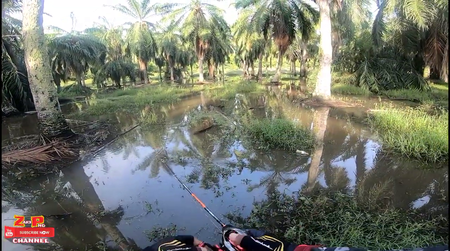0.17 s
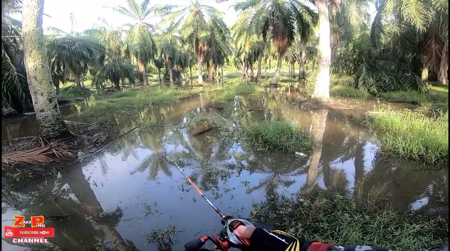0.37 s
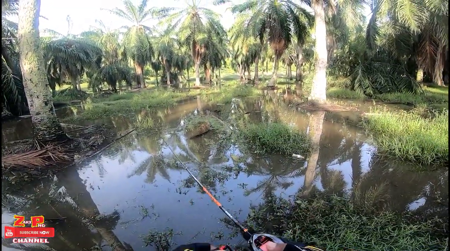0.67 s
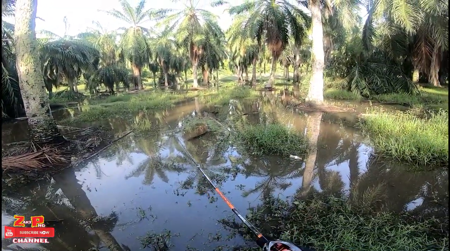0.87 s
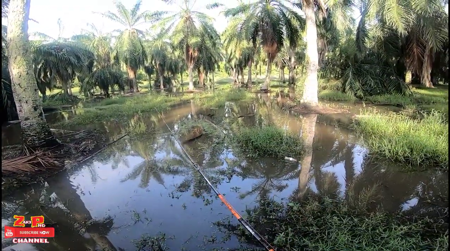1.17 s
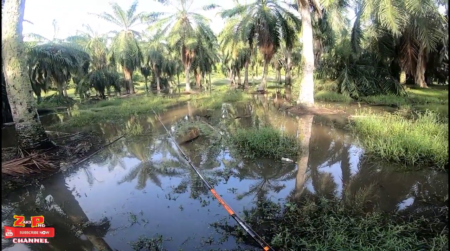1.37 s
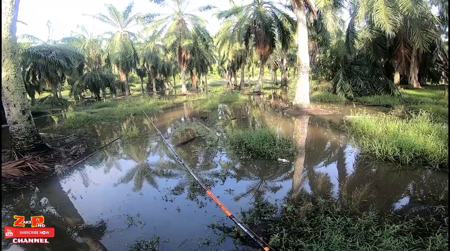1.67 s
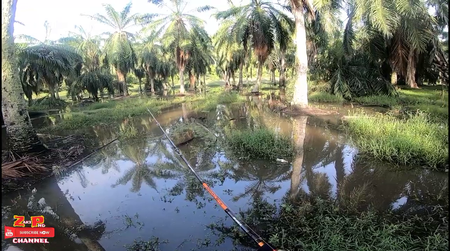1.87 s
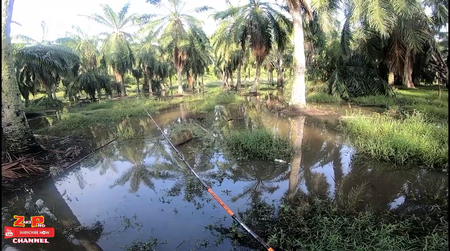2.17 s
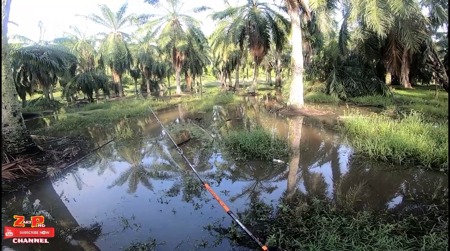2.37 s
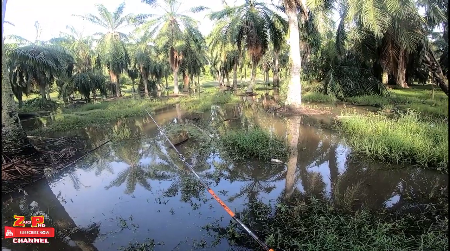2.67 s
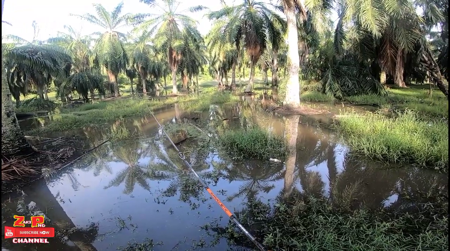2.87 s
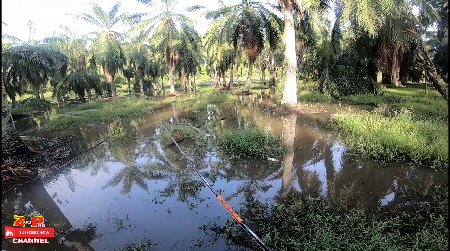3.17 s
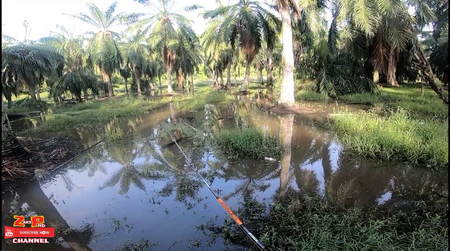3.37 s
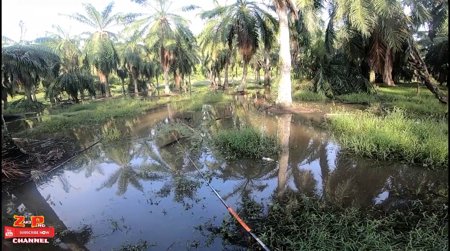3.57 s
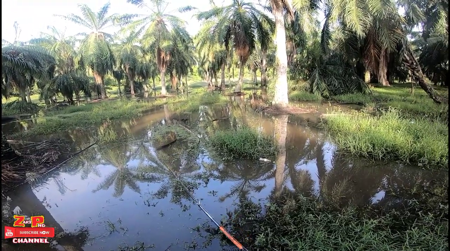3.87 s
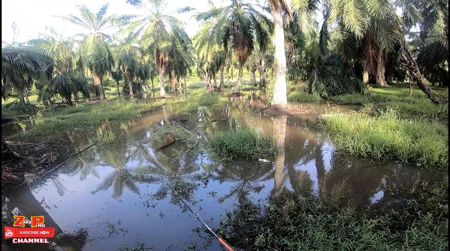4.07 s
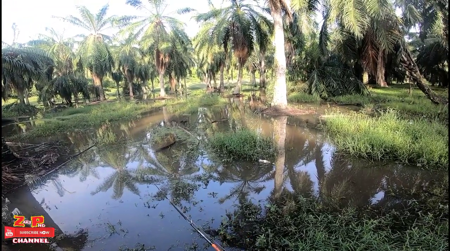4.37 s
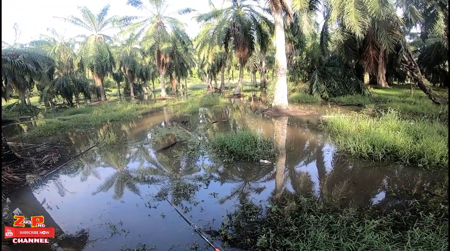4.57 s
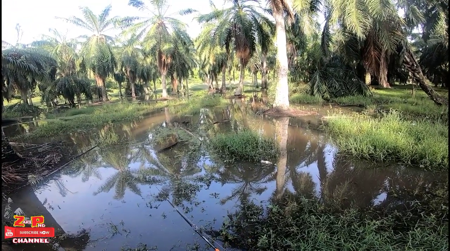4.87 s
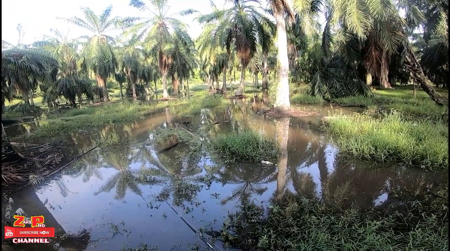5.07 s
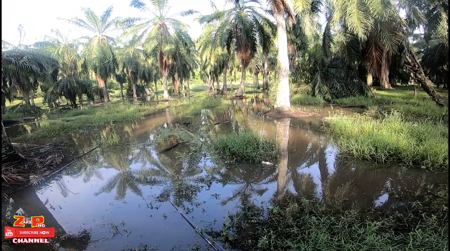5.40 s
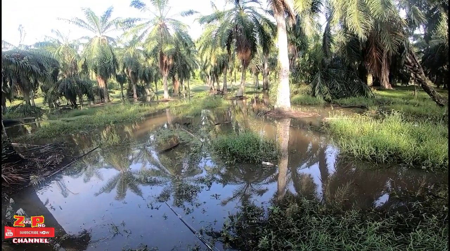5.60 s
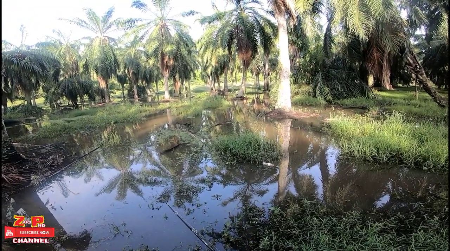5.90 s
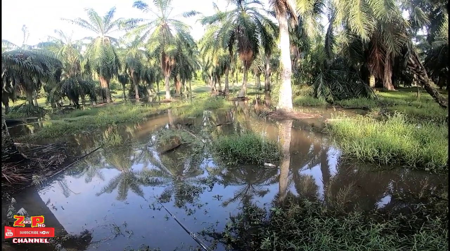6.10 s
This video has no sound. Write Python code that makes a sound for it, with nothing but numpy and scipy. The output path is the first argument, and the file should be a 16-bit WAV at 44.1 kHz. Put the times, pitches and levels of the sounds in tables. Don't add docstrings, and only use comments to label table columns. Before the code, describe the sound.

A daytime flooded grove, heard in wide stereo from a recorder worn close to an angler, its top end dulled by a housing. Throughout, a dense cicada chorus sings as a high, fizzing drone around five kilohertz, swelling only slightly. Beneath it sit a low, wavering pump hum near ninety hertz, soft rumble and a faint engine gradually rising in pitch. At 0.07-0.13 s come tiny contact ticks, then at 0.15 s a loud, dry reel latch snap with very quick bounces. A sleeve rustles softly around 0.5 s while line squeaks faintly from 0.3 to 0.8 s. Later details are almost buried: katydid buzzes in threes from 1.3 and 4.25 s, low hoots near 2.0, 3.4, 4.65 and 5.8 s, a rising bird whistle at 2.8 s, chirps, frog croaks, cricket ticks, and drips at 1.65, 4.6 and 5.8 s. The drone continues to the end at about 6.2 s.

```python
import sys
import numpy as np
from scipy import signal
from scipy.fft import rfft, irfft
from scipy.io import wavfile

SR = 44100
rng = np.random.default_rng(int(sys.argv[2]) if len(sys.argv) > 2 else 0)


def to_wav(s):
    ch = np.atleast_2d(s).T
    pcm = np.round(np.clip(ch, -1, 1) * 32767)
    wavfile.write(sys.argv[1], SR, pcm.astype(np.int16))


def field_ratio(decibels):
    return 10 ** (np.asarray(decibels, dtype=float) / 20)


N = 275184
T = np.arange(N) / SR
HZ = np.maximum(np.arange(N // 2 + 1) * SR / N, 1)
MID_SIDE = np.array([[1], [-1]])


def rms_one(x):
    return x / np.sqrt(np.mean(x ** 2) + 1e-20)


def in_time(rows):
    s, *columns = np.transpose(rows)
    return [np.interp(T, s, column) for column in columns]


def at_hz(points, axis=1):
    points = np.array(points)
    return np.interp(np.log(HZ), np.log(points[:, 0]), points[:, axis])


def drift(rate_hz):
    r = np.exp(-2 * np.pi * rate_hz * 40 / SR)
    white = rng.standard_normal(N // 40 + 2002)
    slow = signal.lfilter([1], [1, -2 * r, r * r], white)[2000:]
    return np.interp(np.arange(N) / 40, np.arange(len(slow)), rms_one(slow))


def ring(clicks, hz, t60_s):
    r = field_ratio(-60 / (t60_s * SR))
    w = 2 * np.pi * hz / SR
    return signal.lfilter([0, np.sin(w)], [1, -2 * r * np.cos(w), r * r], clicks + 1e-18)


def pan(x, db):
    return x * field_ratio(MID_SIDE * db / 2)


# (frequency [Hz], likeness [0-1], left minus right [dB], left lead [rad])
PORT_FIELD = [(60, 0.75, -1, 1.1), (150, 1, -2.5, -1.4), (264, 0.97, -2, 0.4), (420, 0.84, -5, -0.9),
              (690, 0, -2, 0.1), (1130, 0, 1.5, -0.2), (1700, 0.36, .6, 0.15), (2700, 0.43, -.4, -0.8),
              (3880, 0.96, 0.5, 0.82), (4910, 0.32, -4, 0.38), (6200, .05, -6, -0.5),
              (7200, 0.45, -6.5, -3), (8950, 0.02, 4.5, -2.5), (10000, 0.28, 2, -3.5), (13700, 0.6, 1, -2)]


def at_ports(pair, response):
    common, apart = rfft(pair) * response
    alike = np.clip(at_hz(PORT_FIELD), 0, 1)
    turn = field_ratio(at_hz(PORT_FIELD, axis=2) / 2) * np.exp(.5j * at_hz(PORT_FIELD, axis=3))
    common = np.sqrt(1 + alike) * common
    apart = np.sqrt(1 - alike) * apart
    return rms_one(irfft([(common + apart) * turn, (common - apart) / turn], N))


# (frequency [Hz], width [Hz], level [dB])
CICADA_BODY = [(4740, 760, 2), (5167, 790, -3.5), (7260, 890, -14), (8470, 820, -12.5), (8726, 1300, -7),
               (9930, 1600, -15), (14100, 1900, -29.5)]
# (time [s], level [dB])
CHORUS_SWELL = [(0, -57), (.5, -57.5), (1.15, -58), (2.15, -56.5), (3.1, -56), (3.6, -57.5), (4.3, -56.5),
                (5.5, -57), (6.24, -57)]


def cicadas(count=10, buckles_per_s=128, near=0.34, steep=3.16):
    far = rng.standard_normal((2, N))
    buckle = np.zeros((2, N))
    for k in range(count):
        rate_hz = buckles_per_s * rng.uniform(.92, 1.15) * (1 + 0.0152 * drift(4.06))
        pulses = np.exp(4 * np.cos(2 * np.pi * np.cumsum(rate_hz) / SR))
        buckle[k % 2] += field_ratio(1.6 * drift(1.3)) * pulses * rng.standard_normal(N)
    drive = far + near * rms_one(buckle)
    powers = [field_ratio(2 * db) / (1 + (2 * (HZ - hz) / width_hz) ** 2) ** steep
              for hz, width_hz, db in CICADA_BODY]
    low_db, = in_time(CHORUS_SWELL)
    high_db = -61 + 0.97 * (low_db - low_db.mean())
    low = at_ports(drive, np.sqrt(sum(powers[:2])))
    high = at_ports(drive[::-1], np.sqrt(sum(powers[2:])))
    return field_ratio(low_db + 0.87 * drift(8.4)) * low + field_ratio(high_db + 0.5 * drift(20)) * high


def from_right(tones):
    late_s = .00017
    return pan(np.sqrt(2) * np.array([np.interp(T - late_s, T, tones), tones]), -2.04)


# (time [s], level [dB])
PUMP_LEVEL = [(0.0, -36), (0.05, -38), (1.18, -39.5), (1.27, -43), (2.05, -43.5), (2.14, -40), (4.17, -41),
              (5.32, -37.5), (5.56, -43.5), (5.74, -37.5), (6.21, -43), (6.24, -41)]
# (frequency [Hz], level [dB], waver [dB])
PUMP_HUM = [(46.3, -55.5, -3.5), (55.9, -44, 2.5), (62.9, -52, 2.5), (67, -52.5, -4), (96.1, -54, 3.5),
            (91.63, -53.5, 1), (102, -50.5, -2.5), (112.44, -44.5, 2), (140.9, -60, 0), (183.3, -59.5, 1)]


def pumps():
    pump_hz, wander_turns = 93.6, 0.047
    level_db, = in_time(PUMP_LEVEL)
    tones = field_ratio(level_db + 2.0) * np.sin(2 * np.pi * (pump_hz * T + wander_turns * drift(0.29)))
    for hz, hum_db, waver_db in PUMP_HUM:
        turns = hz * T + rng.random() + 0.067 * drift(1.4)
        tones = tones + field_ratio(hum_db + waver_db * drift(1.5)) * np.sin(2 * np.pi * turns)
    return from_right(tones)


# (time [s], firing rate [Hz], level [dB])
ENGINE_RUN = [(0, 55.7, -69), (.9, 56.04, -71.5), (1.2, 55.9, -64), (2.2, 56.34, -64.5),
              (2.6, 57.16, -62.5), (3.7, 57.12, -62.5), (4.2, 56.8, -69), (5, 57, -66.5),
              (5.7, 57.9, -65.5), (6.24, 58.1, -63.5)]
# (multiple of firing rate, level [dB])
FIRING_ORDERS = [(2, 10.5), (3, -3.5), (4, -0.5), (5, -4), (6, -1.54), (7, -14.5)]


def engine():
    hz, level_db = in_time(ENGINE_RUN)
    turns = np.cumsum(hz) / SR
    tones = np.zeros(N)
    for multiple, rel_db in FIRING_ORDERS:
        order = np.sin(2 * np.pi * (multiple * turns + 0.054 * drift(4.8)))
        tones += field_ratio(level_db + rel_db + 2.74 * drift(4.2)) * order
    return from_right(tones)


# (frequency [Hz], density [dB per Hz])
RUMBLE_SPECTRUM = [(20, -32.5), (35, -10), (55, -0.5), (80, -17), (105, -6), (140, -7), (200, -11.5),
                   (300, -20), (420, -34), (700, -56)]


def rumble():
    level_db = -48.5
    return field_ratio(level_db) * at_ports(rng.standard_normal((2, N)), field_ratio(at_hz(RUMBLE_SPECTRUM)))


# (frequency [Hz], density [dB per Hz])
AIR_SPECTRUM = [(240, -15), (400, -7.5), (550, -11), (780, -6.5), (970, -11.5), (1300, -9.5), (2000, -13),
                (3000, -16), (4000, -20), (6200, -19.5), (9000, -14.5), (10300, -17), (11200, -56.5),
                (16000, -79)]


def air(level_db=-60.5, patchy_db=1.5):
    hiss = rfft(at_ports(rng.standard_normal((2, N)), field_ratio(at_hz(AIR_SPECTRUM))))
    edges_hz = [0, 600, 1000, 1500, 2200, 3000, 4000, 5800, 6500, 7500, 9000, SR]
    gust = drift(2.0)
    out = np.zeros((2, N))
    for low, high in zip(edges_hz, edges_hz[1:]):
        band = irfft(hiss * (low <= HZ) * (HZ < high), N)
        out += field_ratio(patchy_db * drift(3.4) + 1.26 * gust) * band
    return field_ratio(level_db) * out


# (frequency [Hz], density [dB per Hz])
CLOTH_SPECTRUM = [(500, -14), (1000, -10), (1400, -0.5), (1900, -2.5), (2700, 0), (3600, 2.5), (4500, -21),
                  (7000, -38)]
# (time of height [s], half length [s], level [dB])
SLEEVE_MOVES = [(0, 0.006, -55), (0.227, 0.029, -74), (0.46, 0.25, -61), (0.587, 0.037, -66),
                (1.002, 0.34, -71), (1.503, 0.074, -69.5), (2.056, 0.088, -65.5), (3.197, 0.15, -68),
                (4.2, .15, -69), (5.22, .02, -69), (5.954, 0.27, -72.5)]


def rustle():
    slips = np.zeros((2, N))
    for hz in (1040, 1500, 2250, 3240):
        grains = rms_one(ring(rng.standard_normal((2, N)), hz, 9 / hz))
        slips += field_ratio(3.6 * drift(40)) * grains * field_ratio(2.0 * drift(8.5))
    near, wide = irfft(rfft(slips) * field_ratio(at_hz(CLOTH_SPECTRUM)), N)
    effort = sum(field_ratio(db) * np.exp(-((T - s) / half_s) ** 2) for s, half_s, db in SLEEVE_MOVES)
    return effort * rms_one(near + 0.47 * wide * MID_SIDE)


# (frequency [Hz], level [dB], t60 [s])
LATCH_MODES = [(450, -19, .012), (800, -14, .012), (1150, -24, .008), (1760, -12, .006), (2200, 0, .004),
               (2800, -4, .003), (3500, -6, .0035), (4700, -14, .004), (5600, -12, .004), (7500, -15, .003),
               (9300, -16, .002), (13700, -8, .001)]
# (time [s], peak [dB], contact pitch [Hz], pan [dB])
LATCH_CONTACTS = [(.0663, -42, 7000, -4), (.118, -46, 2800, 0), (.1297, -40, 2100, 0),
                  (.1546, -29, 6500, 0), (.1483, -36, 700, 0), (.1546, -33, 800, 0), (.1546, -38, 12000, 0),
                  (.1577, -29, 6500, 0), (.1601, -35, 5500, 0), (.1635, -38, 7000, 0),
                  (.1655, -41, 6000, 0), (.168, -48, 4000, 0), (.2155, -50, 8000, 0), (.2215, -50, 2000, 0)]


def latch():
    out = np.zeros((2, N))
    click = np.eye(1, 2000)[0]
    body = sum(field_ratio(db) * ring(click, hz, t60_s) for hz, db, t60_s in LATCH_MODES)
    contacts = list(LATCH_CONTACTS)
    for bounce in range(3):
        for edge in range(2):
            contacts.append((.15455 + bounce * .0034 + edge * .00087,
                             -12 - bounce * 7.5 - edge * 5, 3000 * .84 ** bounce, 0))
    for s, peak_db, contact_hz, pan_db in contacts:
        band = signal.butter(2, [contact_hz / 1.6, contact_hz * 1.6], "band", fs=SR)
        snap = signal.lfilter(*band, body)
        pair = np.array([snap, np.roll(snap, 1)]) / np.abs(snap).max()
        at = round(s * SR)
        out[:, at:at + 2000] += pan(field_ratio(peak_db) * pair, pan_db)
    return out


def cricket():
    every_s, jitter_s, level_db, spread_db = .256, .03, -67, 1.5
    ticks = np.zeros(N)
    for k, (late, strong) in enumerate(rng.standard_normal((26, 2))):
        s = (k + .5) * every_s + jitter_s * late
        ticks += field_ratio(level_db + spread_db * strong) * np.exp(-((T - s) / 0.0056) ** 2)
    return pan(ticks * np.sin(2 * np.pi * 7320 * T), 2.5)


def blurred_calls(rows, blur_share, pan_db):
    out = np.zeros((2, N))
    white = rng.standard_normal((2, N))
    for s, length_s, hz, level_db in rows:
        at, size = round(s * SR), round(length_s * SR)
        t60_s = 1.9 / (blur_share * hz)
        lead_in = white[:, at - 4000:at + size]
        near, wide = ring(ring(lead_in, hz, t60_s), hz, t60_s)[:, 4000:]
        call = rms_one(near + .5 * wide * MID_SIDE)
        swell = np.sqrt(np.sin(np.linspace(0, np.pi, size)) + 1e-9)
        out[:, at:at + size] += pan(field_ratio(level_db) * call * swell, pan_db)
    return out


# (time [s], length [s], pitch [Hz], level [dB])
WATER_SPLASHES = [(.17, .075, 1060, -60.5), (3.456, .033, 1500, -62), (3.546, 0.058, 1420, -63),
                  (4.604, 0.08, 798, -63), (5.822, 0.052, 1130, -68), (6.1, .13, 3410, -66)]


def splashes():
    return blurred_calls(WATER_SPLASHES, 0.26, -1.5)


# (time [s], length [s], pitch [Hz], level [dB])
LINE_SQUEAKS = [(.288, 0.23, 1360, -65), (.334, .05, 2410, -67), (.398, 0.17, 2770, -63.5),
                (.535, 0.072, 2434, -62), (.73, .08, 3470, -69), (5.92, .037, 1860, -66)]


def squeaks():
    return blurred_calls(LINE_SQUEAKS, 0.042, -3)


# (time [s], length [s], pitch [Hz], level [dB])
FROG_CROAKS = [(1.85, .12, 798, -69), (3.25, .39, 770, -70.5), (5.93, .2, 810, -70), (4.75, .12, 860, -72),
               (4.97, 0.093, 783, -72), (.636, 0.11, 1225, -64.5), (.73, .055, 1135, -64.5),
               (.99, 0.11, 1310, -69), (1.49, 0.078, 1320, -67), (1.85, .42, 1210, -69),
               (2.54, 0.053, 1210, -68), (2.67, 0.081, 1217, -66), (3.3, .41, 1208, -69),
               (3.7, .33, 1310, -70), (4.955, .1, 1234, -70), (6.125, .11, 1500, -70)]


def croaks():
    return blurred_calls(FROG_CROAKS, 0.048, 2.5)


# (time [s], length [s], pitch [Hz], level [dB])
BIRD_CHIRPS = [(1.07, .31, 2120, -72), (1.35, .35, 1990, -67.5), (2.675, .11, 1915, -68),
               (3.1, 0.082, 3360, -75), (4.347, .05, 2148, -62), (4.54, .05, 2230, -73),
               (4.62, .045, 2170, -70), (4.726, .05, 2230, -69)]


def chirps():
    return blurred_calls(BIRD_CHIRPS, 0.035, 1.5)


# (time [s], level [dB])
BUZZ_PHRASES = [
    (1.32, -62.5),
    (4.25, -64),
]


def katydid():
    every_s, length_s, gain_db = 0.322, .23, 0.6
    strokes = np.zeros(N)
    for phrase_s, phrase_db in BUZZ_PHRASES:
        for k in range(3):
            s = phrase_s + k * every_s
            shape = np.clip(np.minimum((T - s) / 0.058, (s + length_s - T) / .03), 0, 1)
            strokes += field_ratio(phrase_db + k * gain_db) * shape
    teeth = np.diff(np.floor(150 * T + 0.15 * drift(8)), prepend=0)
    scrape = 0.045 * rng.standard_normal(N)
    buzz = strokes * rms_one(ring(ring(teeth + scrape, 8130, 0.0081), 7920, 0.0074))
    return pan(np.array([buzz, np.roll(buzz, 2)]), 3)


# (time [s], length [s], start pitch [Hz], end pitch [Hz], level [dB], pan [dB])
DRIP_BUBBLES = [
    (1.645, .02, 2500, 3050, -59, -4),
    (4.615, .04, 620, 1150, -59, -3),
    (5.83, .025, 800, 1300, -61, -4),
]


def drips():
    out = np.zeros((2, N))
    for s, length_s, start_hz, end_hz, level_db, pan_db in DRIP_BUBBLES:
        way = np.clip((T - s) / length_s, 0, 1)
        turns = np.cumsum(start_hz + (end_hz - start_hz) * way) / SR
        out += pan(field_ratio(level_db) * np.sin(np.pi * way) * np.sin(2 * np.pi * turns), pan_db)
    return out


HOOT_S, HOOT_HZ = 0.093, 863
# (time [s], length [s], pitch [Hz], level [dB])
FAR_HOOTS = [(s, HOOT_S, HOOT_HZ, db) for s, db in [(2.02, -62.5), (3.39, -66), (4.65, -66), (5.82, -65)]]


def hoots():
    return blurred_calls(FAR_HOOTS, 0.037, -6)


def whistle():
    start_s, length_s, start_hz, rise_hz, level_db = 2.81, .13, 3740, 900, -62
    echo_s, echo_loss_db = .037, 2.5
    way = np.clip((T - start_s) / length_s, 0, 1)
    tone = np.sin(2 * np.pi * np.cumsum(start_hz + rise_hz * way) / SR)
    rough = np.array([drift(90), drift(90)])
    call = field_ratio(level_db) * np.minimum(12 * way, 1 - way) ** .4 * rough * tone
    return sum(field_ratio(-echo_loss_db * k) * np.roll(call, round(k * echo_s * SR), axis=1) for k in range(5))


def scene():
    drone = cicadas() + pumps() + engine() + rumble() + air()
    angler = rustle() + latch() + squeaks()
    animals = cricket() + croaks() + chirps() + katydid() + hoots() + whistle()
    return drone + angler + animals + splashes() + drips()


# (frequency [Hz], gain [dB])
HOUSING_GAIN = [(10300, 0), (10900, -5), (11100, -25), (13000, -25), (13200, -4), (13900, 0), (14500, -3),
                (14700, -7), (15200, -6)]


def housing(dry):
    slope = np.linspace(dry[:, 0], dry[:, -1], N).T
    return slope + irfft(rfft(dry - slope) * field_ratio(at_hz(HOUSING_GAIN)), N)


def band_limit(x):
    return signal.sosfilt(signal.butter(12, 15140, fs=SR, output="sos"), x)


def record(dry):
    return band_limit(housing(dry))


dry = scene()
out = record(dry)
to_wav(out)
```